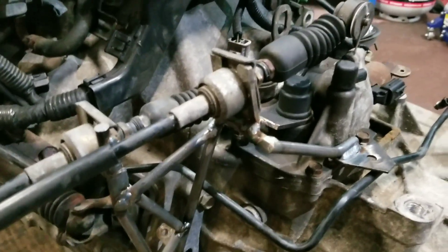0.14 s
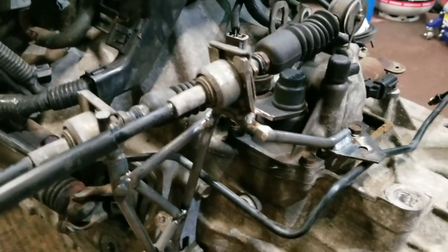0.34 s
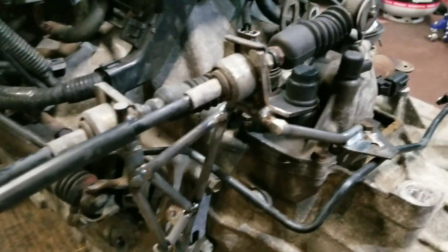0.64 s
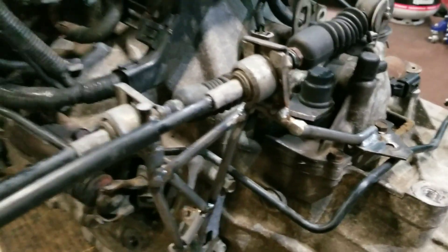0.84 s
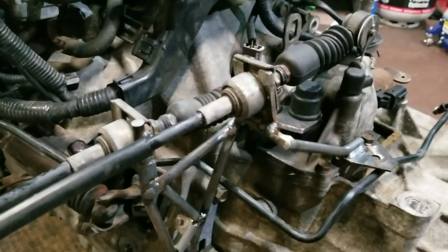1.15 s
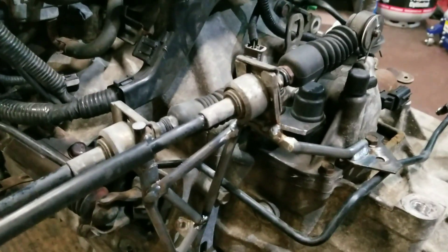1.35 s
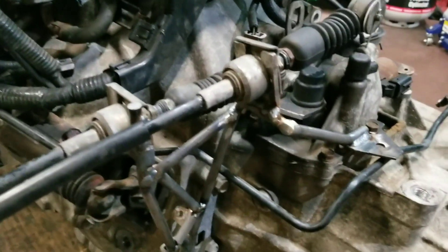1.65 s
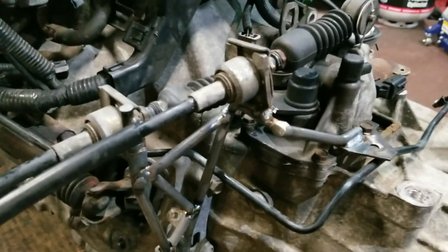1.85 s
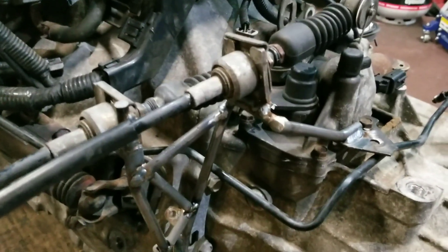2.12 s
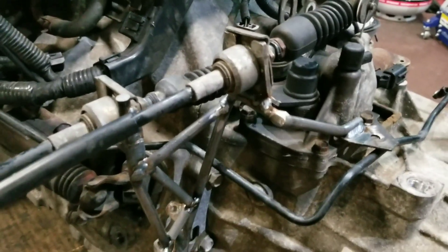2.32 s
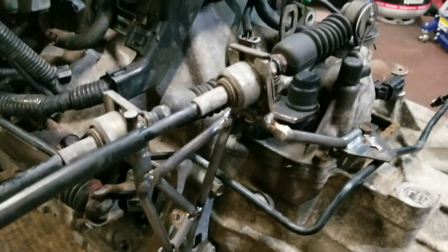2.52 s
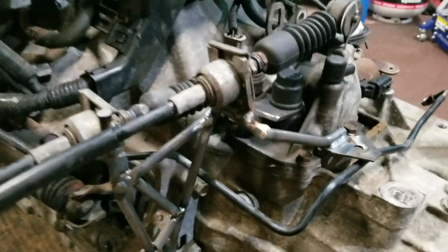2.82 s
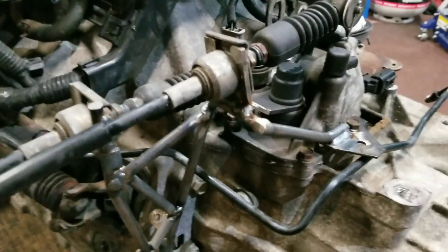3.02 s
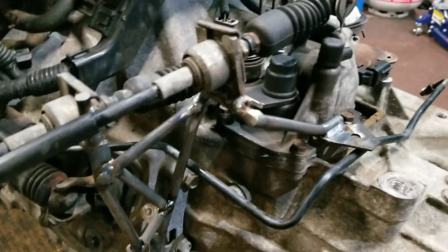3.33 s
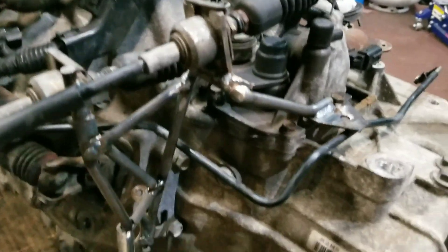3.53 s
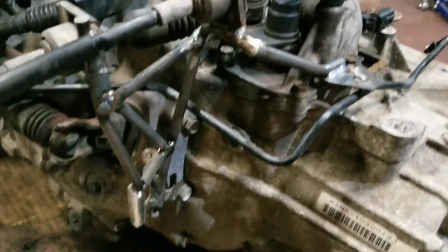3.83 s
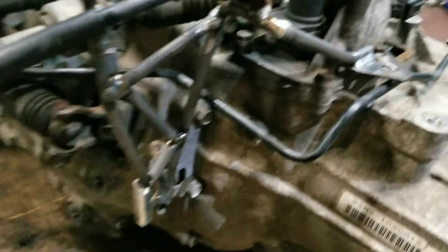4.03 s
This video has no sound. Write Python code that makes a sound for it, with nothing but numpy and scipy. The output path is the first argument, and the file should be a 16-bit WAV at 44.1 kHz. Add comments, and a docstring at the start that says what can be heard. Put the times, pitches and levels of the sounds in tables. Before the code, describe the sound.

A gearbox shift linkage is worked by hand, close and to the left, in a hard-walled garage with faint electrical hum and rumble. The faint tail of an earlier knock fades at the start. Sharp steel clicks strike at about 0.4 and 0.6 seconds, each rattling briefly over a dull clunk from the housing and leaving a bright echo. From 1.3 seconds a rod sings very faintly under load, until the loudest cluster of clicks and clunks at 1.6 to 1.7 seconds. A softer clunk comes at 2.1, then sharp clicks at 2.3 to 2.4, a double click at 2.8 and a small tick at 3. The rods then slide with a faint hiss. Around 4 seconds a finger lightly taps the microphone on the right, followed by a soft click and clunk and a tiny dry squeak.

```python
"""The fading room tail of an earlier knock, then sharp steel clicks: a gearbox shift linkage worked by
hand, close and to the left. Joints hit their stops and rattle on briefly; the alloy housing clunks.
Friction makes the rods hiss in their bushes, one sing faintly under load and a dry bush squeak near
the end, just after a finger taps the microphone. A hard-walled garage answers the clicks and clunks
with a long bright tail, over a bed of mains hum and rumble."""
import sys
import numpy as np
from scipy import signal
from scipy.io import wavfile

SR = 44100
rng = np.random.default_rng(int(sys.argv[2]) if len(sys.argv) > 2 else 0)


def int16_out(signal):
    """Quantize to a 16-bit WAV file."""
    q = np.round(np.clip(np.atleast_2d(signal).T, -1, 1) * 32767)
    wavfile.write(sys.argv[1], SR, q.astype(np.int16))


N = 183764
TIME = np.arange(N) / SR

# joints hitting their stops: t/s, level/dB, brightness/(dB per octave), rattle re the hit/dB
CLICKS = [(0.437, -39.5, 1.5, 4), (0.451, -13.5, -1, -11.5), (0.628, -5.5, 4.5, -5.5), (0.645, -12, 5, -2),
          (0.6542, -15.5, -1.5, -4.5), (1.013, -55, 4, -9), (1.2223, -53.5, -6.5, -5),
          (1.266, -45, -3, -10), (1.6032, -5, 6.5, -8.5), (1.6155, -9.5, 5, -8), (1.6247, -19.5, -0.5, 0),
          (1.6696, -4, 9.5, -5.5), (1.6812, -3, 2.5, -3), (2.092, -27, 2, -3), (2.1036, -25, 4, -7),
          (2.2918, -10.5, 3.5, -7), (2.3085, -23, 3.5, -9), (2.3131, -16, 6.5, -9.5), (2.355, -38, 12, -8),
          (2.3948, -28.5, 6, 3.5), (2.4218, -12, 6.5, -10), (2.6913, -38, 4.5, -4.5),
          (2.8265, -11.5, 5, -6.5), (2.8482, -14, 2.5, -5), (3.0145, -29, 4, -10), (3.075, -52.5, 4.5, -8),
          (3.671, -63, 0.5, -8.5), (3.695, -56, 6, -4.5), (3.816, -64, 6, -9), (4.031, -30.5, 0, -4.5)]
# steel joint modes: f/Hz, left level/dB, right level/dB
JOINT_MODES = [(1100, -9.5, -12), (1554, -5.5, 1), (2080, -3.5, -17), (2343, -3, -1), (2766, -6, -7),
               (3400, 0.5, -9.5), (4050, 0.5, -14), (5020, -6, -6.5), (6120, -1, -8.5),
               (7020, -12.5, -10.5), (7150, -30.5, -17.5), (10200, -22.5, -18), (11200, -20, -15.5),
               (12500, -13.5, -29), (15400, -21.5, -21)]
# dull blows on the housing: t/s, level/dB, pitch struck/Hz, roll-off around it/(dB per octave)
CLUNKS = [(0.433, -35, 595, 12), (0.457, -31.5, 440, 10), (0.61, -41, 456, 9.5), (0.642, -30.5, 416, 23),
          (0.655, -29, 439, 7), (1.221, -47.5, 581, 9), (1.61, -32, 590, 9.5), (1.624, -27.5, 533, 13),
          (1.681, -28, 676, 11), (1.696, -26.5, 415, 22), (2.085, -29, 600, 18), (2.291, -40, 590, 11.5),
          (2.324, -36, 556, 10.5), (2.403, -41, 610, 4), (2.693, -53, 592, 10.5), (2.833, -39, 564, 8),
          (2.855, -34, 610, 6.5), (3.995, -44, 290, 8), (4.038, -35, 410, 22.5), (4.053, -44.5, 430, 21)]
# alloy housing modes: f/Hz, level/dB, t60/s
HOUSING_MODES = [(140, -4.5, 0.048), (198.2, -4.5, 0.038), (279, -2, 0.047), (350, -6.5, .05),
                 (436.8, -0.8, 0.035), (499.8, -9.5, 0.054), (595, 0.1, 0.023), (711, -4, 0.018),
                 (886, -2.5, 0.025)]
# the room tail of an earlier knock (first row), then rods sliding and hands on the metal:
# t/s, rise/s, hold/s, body level/dB, hiss level/dB
NOISE_SWELLS = [(-.08, 0.13, .1, -56, -75), (.225, 0.026, 0.045, -63, -70), (1.2, .02, 0.016, -65.5, -83.5),
                (2.055, 0.016, 0.022, -57, -59), (2.387, 0.0065, 0.012, -46.5, -56.5),
                (3.0, 0.021, 0.097, -59, -73.5), (3.1, .05, .14, -70.5, -80), (3.5, 0.21, 0.14, -79, -73.5),
                (3.836, 0.043, 0.12, -58.5, -61.5), (4.0, .04, .14, -59, -72)]
# colour of the hiss: f/Hz, spectral level/dB
HISS_SPECTRUM = [(3500, -8.5), (5000, -7.5), (6700, 6.5), (8500, -15.5), (12500, -9), (16000, -12)]
# resonances of the loaded rod: f/Hz, nominal width/Hz, level/dB
ROD_MODES = [(2310, 60, 0.1), (2600, 80, -4), (2900, 60, -3), (4080, 50, -1.5), (6500, 60, -11)]
# resonances of the dry bush: f/Hz, width/Hz, level/dB
BUSH_MODES = [(1290, 85, 0), (1950, 90, -6), (2360, 50, -1), (3190, 56, -4)]
# one finger tap on the microphone body: t/s, level/dB, left over right/dB
FINGER_TAP = (3.9648, -28, -19)
# microphone body modes: f/Hz, level/dB, t60/s
TAP_MODES = [(109.3, -16, 0.1), (695, 6, 0.0046), (2580, -8, 0.0019)]
# garage reverb: f/Hz, t60/s, spectral level/dB
GARAGE_DECAY = [(120, 3, -6.5), (385, 0.76, -0.1), (1000, 0.61, 4.5), (2730, 0.69, -1.74), (5800, 0.57, -2),
                (9000, 0.5, 0.5), (15000, 0.36, -4)]
# mains tones: f/Hz, level/dB
HUM_TONES = [(59.2, -76.5), (242.2, -79.5), (360.7, -81), (479.1, -89.5), (597.5, -84)]
# colour of the room tone: f/Hz, spectral level/dB
RUMBLE_SPECTRUM = [(20, -32), (35, -24.5), (60, -4.5), (120, -11), (200, -17.5), (330, -27.5), (650, -39),
                   (1200, -43.5), (3000, -43.5), (7000, -42), (9000, -52), (13000, -43), (16000, -48)]
# stereo image of diffuse sound: f/Hz, left-right correlation
DIFFUSE_CORRELATION = [(60, 0.95), (290, 0.65), (640, 0.13), (1400, .01), (15000, 0.029)]

JOINT_CYCLES = 17   # greased joints lose 60 dB in this many cycles


def joint_clicks(crack_hz=3150, crack_db=4, snap_db=-7, rattle_t60_s=.073):
    """One hard contact, then play in the joints chatters and dies; both ring the steel modes."""
    out, t = np.zeros((2, N)), TIME[:SR // 5]
    # the faces touch for a tenth of a millisecond
    contact = signal.lfilter([.25, .5, .25], [1, -.3], impulse(len(t)))
    for start, level_db, bright_db, rattle_db in CLICKS:
        fade = from_db(rattle_db - 60 * t / rattle_t60_s) * (1 - np.exp(-t / .0007))
        shared, own = [.2 * fade * grains(len(t), per_s=5000, spread_db=2) for _ in range(2)]
        chatter = np.array([shared, .7 * shared + .7 * own])
        crack = ring(impulse(len(t)), crack_hz * rng.normal(1, .06), t60=.008)
        snap = from_db(snap_db + 2 * bright_db) * np.gradient(contact)   # the bare touch, with no ring
        hit = from_db(crack_db) * crack * [[1], [.95]] + snap * [[1], [.6]]
        rattle = np.zeros_like(hit)
        for k, (hz, left_db, right_db) in enumerate(JOINT_MODES):
            hz = hz * rng.normal(1, .04)   # the joints sit a little differently each time
            t60 = JOINT_CYCLES / hz
            gain = from_db(np.array([[left_db], [right_db]]) + bright_db * np.log2(hz / 3000))
            gain *= (-1) ** k * from_db(rng.normal(0, 1.5, (2, 1)))
            if k % 3 == 2:
                gain[1] *= -1   # some modes arrive reversed on the right
            low_cut = min(hz / 2500, 1) ** 1.5   # so short a touch hardly stirs the low modes
            hit += low_cut * gain * ring(contact, hz, t60)
            reaches_mode = rng.random(len(t)) < .6
            rattle += gain * ring(chatter * reaches_mode, hz, t60)
        scale = from_db(level_db) / np.abs(hit[0]).max()
        pan_db = 10.5 + .1616 * level_db   # fainter contacts sit nearer the middle
        add(out, start, pan(scale * hit, pan_db) + pan(scale * rattle, .5 * pan_db))
    return highpass(out, hz=700)   # small parts radiate no bass


def housing_clunks(shudder_db=-10.5, shudder_t60_s=.14):
    """A soft blow swells into the modes near the pitch struck; the casting shudders on its mounts."""
    out, t = np.zeros((2, N)), TIME[:SR // 5]
    for start, level_db, struck_hz, rolloff_db in CLUNKS:
        shaking = rng.standard_normal(len(t)) * from_db(shudder_db - 60 * t / shudder_t60_s)
        body = np.zeros(len(t))
        for k, (hz, mode_db, t60) in enumerate(HOUSING_MODES):
            gain = (-1) ** k * from_db(mode_db - rolloff_db * abs(np.log2(hz / struck_hz)))
            body += gain * soft_ring(hz * rng.normal(1, .018), t60, len(t))
        shudder = signal.fftconvolve(body, shaking)[:len(t)] / np.linalg.norm(body)
        clunk = body / np.abs(body).max() + shudder
        add(out, start, from_db(level_db) * pan(clunk, pan_db=6))
    return out


def opening_tail_and_slides(swell_db=35, drop_db=7.5, drop_s=.011, fall_db_per_s=150.5):
    """Dense grains ring the steel under a fine hiss: first a knock's room tail, then rod friction."""
    body_gain, hiss_gain = np.zeros((2, N))
    for start, rise, hold, body_db, hiss_db in NOISE_SWELLS:
        to_crest = np.clip((start + rise - TIME) / rise, 0, 1)
        released = np.maximum(TIME - start - rise - hold, 0)
        release_db = fall_db_per_s * released + drop_db * (1 - np.exp(-released / drop_s))
        envelope = (TIME > start) * from_db(-swell_db * to_crest ** 2 - release_db)
        body_gain += from_db(body_db) * envelope
        hiss_gain += from_db(hiss_db) * envelope
    body = np.zeros((2, N))
    for channel in body:
        for hz, mode_db, _ in [(770, -13.5, -12)] + JOINT_MODES[:6]:   # one extra mode below the joint's
            drive = grains(N, per_s=6300, spread_db=-4)
            channel += from_db(.32 * mode_db) * ring(drive, hz, .67 * JOINT_CYCLES / hz)
    hiss = sum(from_db(at_hz(HISS_SPECTRUM, hz)) * band for hz, band in diffuse_bands(N) if hz > 3500)
    return body_gain * rms_one(body) + hiss_gain * rms_one(hiss)


def rod_singing(start_s=1.265, end_s=1.6, steady_db=-80, onset_db=10, settle_s=.03):
    """Friction makes a rod sing faintly, loudest as it takes the load."""
    since = np.maximum(TIME - start_s, 0)
    envelope = (since > 0) * (TIME < end_s) * from_db(steady_db + onset_db * np.exp(-since / settle_s))
    return envelope * friction_tones(ROD_MODES, ring_factor=2)


def bush_squeak(crest_s=4.122, rise_s=.025, fall_s=.006, level_db=-47):
    """Friction in a dry bush squeaks, growing until the rod stops."""
    since = TIME - crest_s
    envelope = np.exp(-np.maximum(-since / rise_s, since / fall_s))
    return from_db(level_db) * envelope * friction_tones(BUSH_MODES, ring_factor=2.2)


def finger_tap():
    """A short knock and low thump on the right, carried through the microphone body, not the air."""
    out = np.zeros((2, N))
    start, level_db, pan_db = FINGER_TAP
    knock = -sum(from_db(level_db + db) * ring(impulse(SR // 5), hz, t60) for hz, db, t60 in TAP_MODES)
    add(out, start, pan(knock, pan_db))
    return out


def garage_reverb(sound, first_echo_s=.008, level_db=-12):
    """Echoes too dense to tell apart: noise that dies band by band, starting after the first wall."""
    t = TIME[:SR + SR // 2]
    tail = sum(band * from_db(at_hz(GARAGE_DECAY, hz, column=2) - 60 * t / at_hz(GARAGE_DECAY, hz))
               for hz, band in diffuse_bands(len(t)))
    tail *= np.clip(t / first_echo_s - 1, 0, 1)
    tail /= np.sqrt(np.sum(tail ** 2) / 2)
    tail = pan(tail, pan_db=4)   # the near wall is on the left
    return from_db(level_db) * signal.fftconvolve(sound.mean(axis=0)[None], tail, axes=1)[:, :N]


def room_tone(rumble_db=-65):
    """Distant rumble and air, with slightly unsteady mains tones."""
    air = sum(from_db(at_hz(RUMBLE_SPECTRUM, hz)) * band for hz, band in diffuse_bands(N))
    hum = np.zeros(N)
    for hz, level_db in HUM_TONES:
        steady = np.sin(2 * np.pi * (hz * TIME + rng.random()))
        waver = rms_one(ring(rng.standard_normal(N), hz, t60=.48))
        hum += from_db(level_db) * (1.3 * steady + .5 * waver)
    return from_db(rumble_db) * rms_one(air) + hum


def ring(drive, hz, t60):
    """One mode: a unit click starts a decaying sine of height 1."""
    decay, angle = from_db(-60 / (t60 * SR)), 2 * np.pi * hz / SR
    return signal.lfilter([0, np.sin(angle)], [1, -2 * decay * np.cos(angle), decay ** 2], drive + 1e-18)


def soft_ring(hz, t60, size):
    """A soft attack: one mode driven through itself swells, then dies; peak 1."""
    wave = ring(ring(impulse(size), hz, t60), hz, t60)
    return wave / np.abs(wave).max()


def friction_tones(modes, ring_factor):
    """Stereo friction noise through narrow resonances."""
    return sum(from_db(db) * rms_one(ring(rng.standard_normal((2, N)), hz, t60=ring_factor / width))
               for hz, width, db in modes)


def grains(size, per_s, spread_db):
    """Random tiny ticks of uneven strength and sign."""
    strength = from_db(spread_db * np.minimum(rng.exponential(1, size), 4))
    sign = rng.choice([-1, 1], size)
    return rms_one(strength * sign * (rng.random(size) < per_s / SR))


def diffuse_bands(size):
    """Half-octave bands of stereo noise, centred in the bass and wide in the treble."""
    white = rng.standard_normal((2, 2, size))
    edges_hz = 20 * 2 ** np.arange(0, 10.1, .5)
    for k, (low, high) in enumerate(zip(edges_hz, edges_hz[1:])):
        bandpass = signal.butter(2, [low, high], "band", fs=SR, output="sos")
        mid, side = signal.sosfilt(bandpass, white[k % 2])
        hz = np.sqrt(low * high)
        alike = at_hz(DIFFUSE_CORRELATION, hz)
        yield hz, np.sqrt(1 + alike) * mid + np.sqrt(1 - alike) * side * [[1], [-1]]


def impulse(size):
    """A unit click."""
    return 1. * (np.arange(size) == 0)


def from_db(db):
    """dB to gain."""
    return 10 ** (np.asarray(db) / 20)


def rms_one(x):
    """Scale to unit rms."""
    return x / np.sqrt(np.mean(x ** 2) + 1e-20)


def at_hz(table, hz, column=1):
    """Read a column of a spectrum table on a log-frequency scale."""
    table = np.array(table)
    return np.interp(np.log(hz), np.log(table[:, 0]), table[:, column])


def highpass(sound, hz):
    """Roll off the bass at 12 dB per octave."""
    return signal.sosfilt(signal.butter(2, hz, "high", fs=SR, output="sos"), sound)


def pan(sound, pan_db):
    """Pan a mono or stereo sound; positive is left."""
    return sound * from_db([[pan_db / 2], [-pan_db / 2]])


def add(track, start_s, sound):
    """Mix a stereo sound in at a time."""
    i = round(start_s * SR)
    track[:, i:i + sound.shape[1]] += sound[:, :N - i]


def scene():
    """Only clicks and clunks feed the reverb; the quieter textures sit over the room tone."""
    clicks, clunks = joint_clicks(), housing_clunks()
    reverb = garage_reverb(clicks + .86 * clunks)
    textures = opening_tail_and_slides() + rod_singing() + bush_squeak()
    return clicks + clunks + reverb + textures + finger_tap() + room_tone()


def record(dry, ceiling=.84, cutoff_hz=15900):
    """Round off the loudest peaks, thin the deep bass and cut the very top steeply."""
    rounded = dry / (1 + np.abs(dry / ceiling) ** 8) ** (1 / 8)
    top_cut = signal.ellip(12, .5, 95, cutoff_hz, fs=SR, output="sos")
    return signal.sosfilt(top_cut, highpass(rounded, hz=36))


dry = scene()
out = record(dry)
int16_out(out)
```